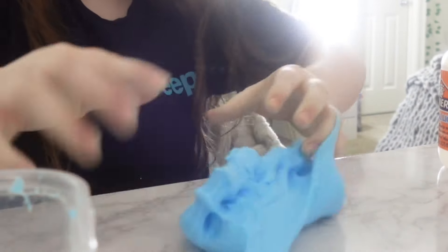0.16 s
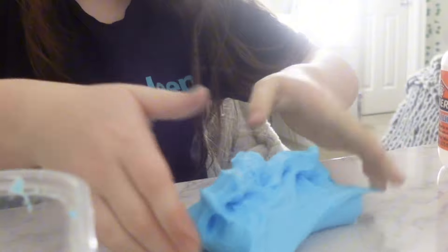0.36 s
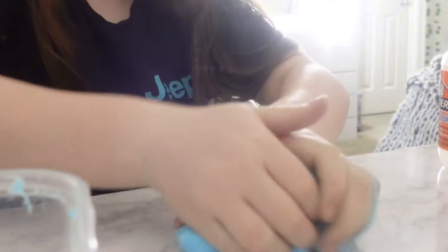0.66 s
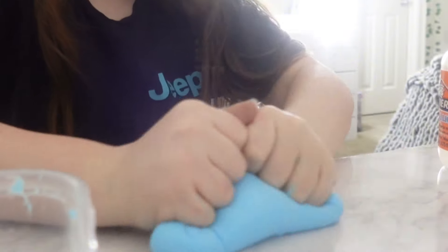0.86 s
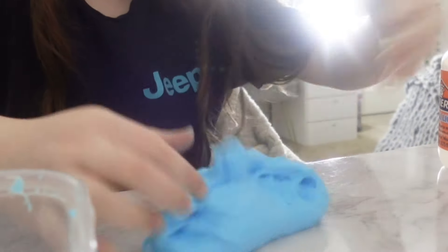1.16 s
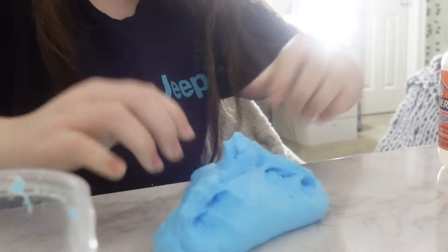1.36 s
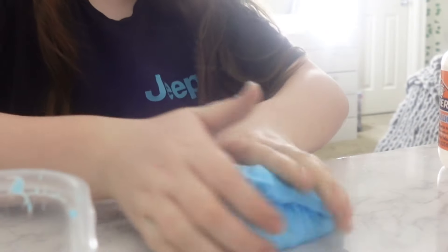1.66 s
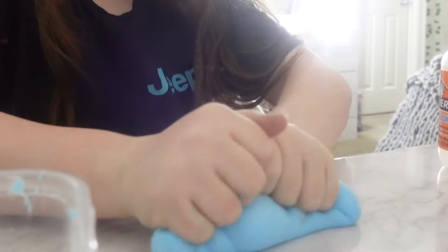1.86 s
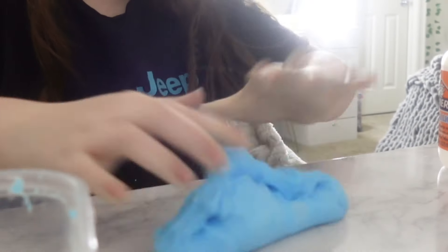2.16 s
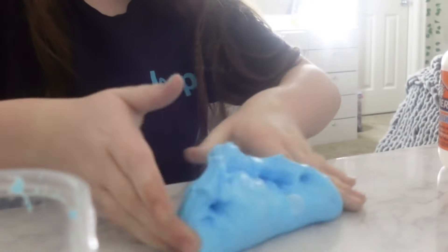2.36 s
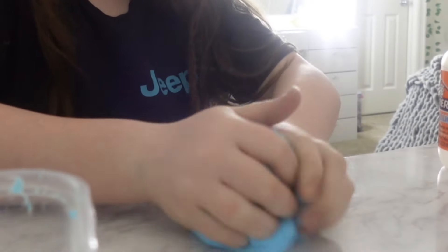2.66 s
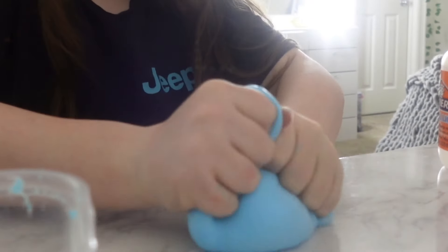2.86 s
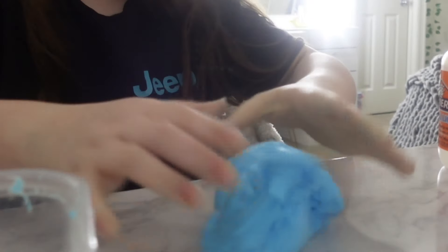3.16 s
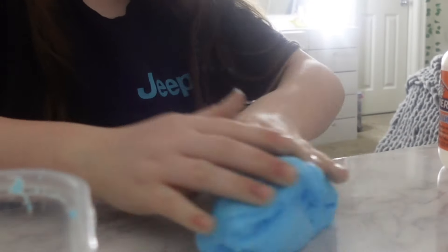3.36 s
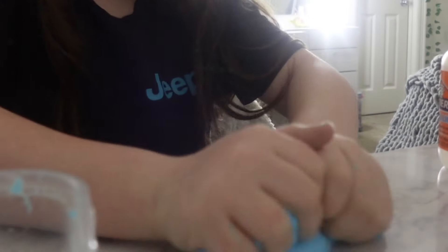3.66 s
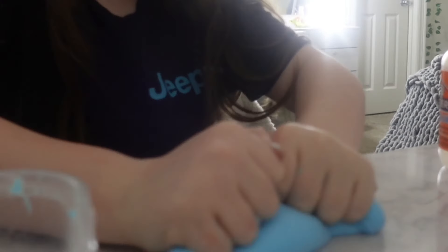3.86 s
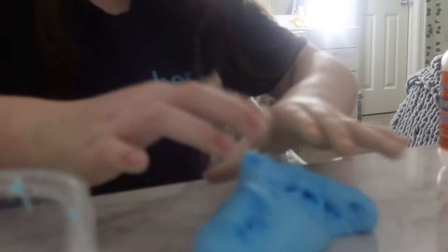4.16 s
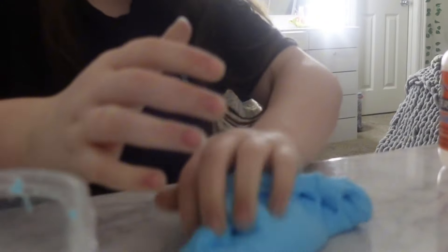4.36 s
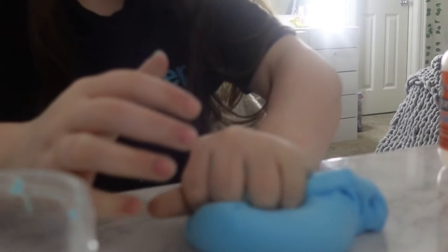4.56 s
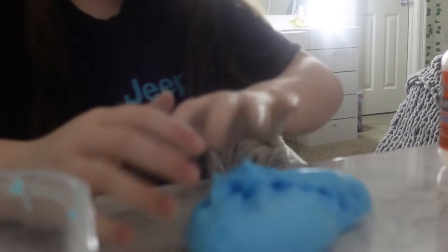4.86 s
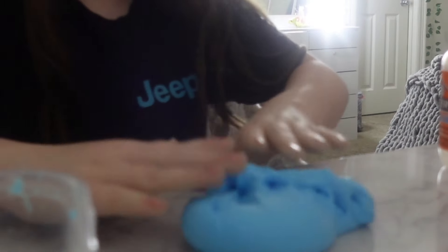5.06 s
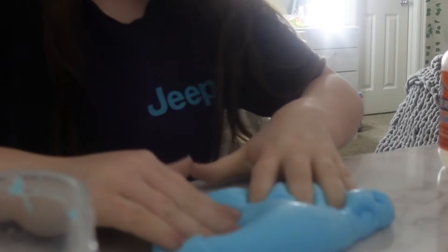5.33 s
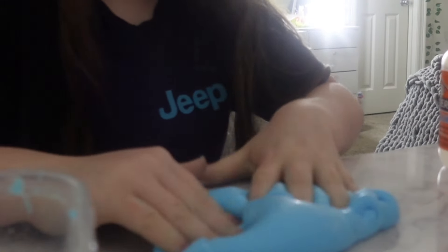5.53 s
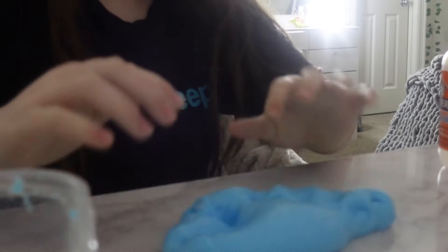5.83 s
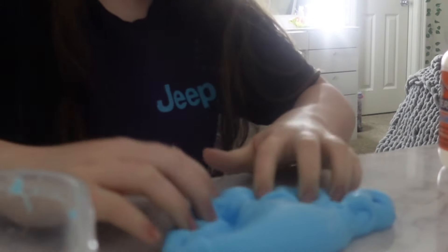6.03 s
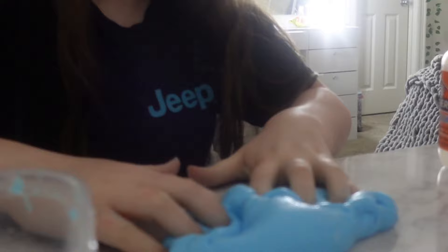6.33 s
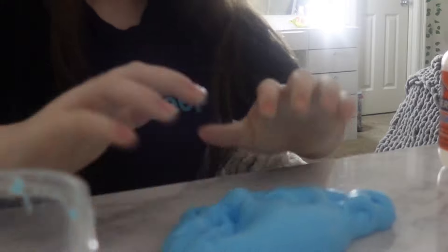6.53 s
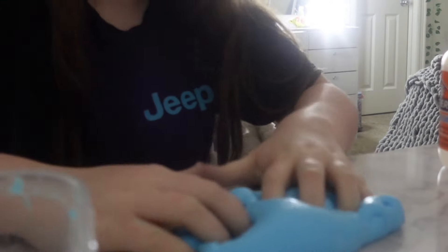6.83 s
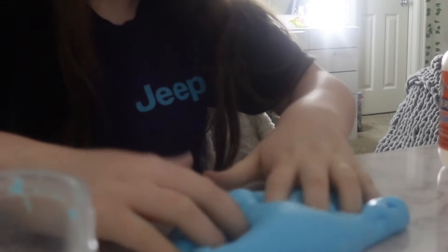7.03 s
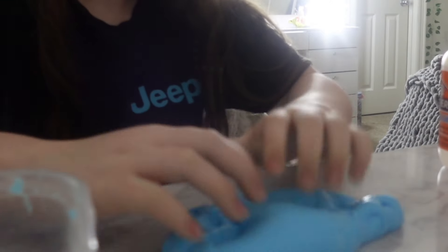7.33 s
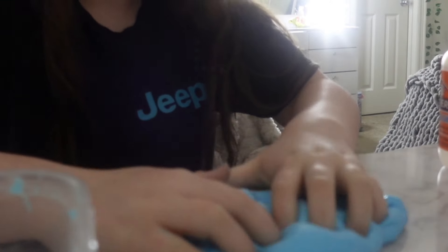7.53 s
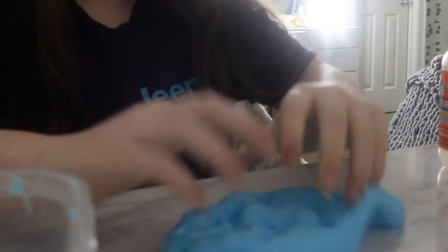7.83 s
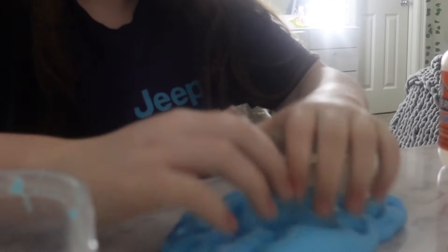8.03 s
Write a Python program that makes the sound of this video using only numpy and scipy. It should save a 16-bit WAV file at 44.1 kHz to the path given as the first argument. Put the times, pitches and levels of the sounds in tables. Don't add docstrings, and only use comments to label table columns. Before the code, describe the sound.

Wet slime kneaded by hand on a hard table, bursting in sharp pops and crackles with squelches, soft thuds and faint fan whirr.

```python
import sys
import numpy as np
from scipy import signal
from scipy.fft import rfft, irfft
from scipy.io import wavfile

SR = 44100
rng = np.random.default_rng(int(sys.argv[2]) if len(sys.argv) > 2 else 0)


def magnitude_from_level(level_db):
    exponent = np.asarray(level_db, float) / 20
    return 10 ** exponent


def store_pcm(level_fs):
    pcm = np.round(np.clip(level_fs, -1, 1) * 32767).astype(np.int16)
    wavfile.write(sys.argv[1], SR, np.atleast_2d(pcm).T)


N = 361179


def rms_one(x):
    return x / np.sqrt(np.mean(x ** 2) + 1e-20)


def at_hz(points, hz):
    known_hz, values = np.array(points)[:, 0], np.array(points)[:, 1]
    return np.interp(np.log(np.maximum(hz, 1)), np.log(known_hz), values)


def highpass(x, order, hz):
    return signal.sosfilt(signal.butter(order, hz, "high", fs=SR, output="sos"), x)


def band(x, low_hz, high_hz):
    edges = [low_hz, min(high_hz, .45 * SR)]
    return signal.sosfilt(signal.butter(2, edges, "band", fs=SR, output="sos"), x)


def ring(x, hz, t60):
    r = magnitude_from_level(-60 / (t60 * SR))
    w = 2 * np.pi * hz / SR
    return signal.lfilter([0, np.sin(w)], [1, -2 * r * np.cos(w), r * r], x + 1e-18)


def drift(rate):
    knots = rng.standard_normal(N // 100)
    return np.interp(np.arange(N) * rate / SR, np.arange(len(knots)), knots)


def grains(pitches_hz, centre_hz, octaves, per_s, spread_db, cycles, wash):
    sizes = magnitude_from_level(spread_db * np.minimum(rng.exponential(1, N), 4)) * rng.choice([-1, 1], N)
    clicks = rms_one(sizes * (rng.random(N) < per_s / SR))
    dealt = rng.integers(0, len(pitches_hz), N)
    white = rng.standard_normal((2, N))
    out, power = 0, 0
    for k, hz in enumerate(pitches_hz):
        nearness = np.exp(-(np.log2(hz / centre_hz) / octaves) ** 2 / 2)
        share = nearness * magnitude_from_level(2.6 * drift(60))
        push = clicks * (dealt == k) + wash * white[k % 2]
        ringing = band(ring(push, hz, cycles / hz), 0.5 * hz, 1.66 * hz)
        out = out + share * rms_one(ringing)
        power = power + share ** 2
    return out / np.sqrt(power)


def effort(s, hold, level_db, rise, fall, build_db):
    settle_db, settle_db_per_s, rest_db = -20.5, 43, -76.5
    t = np.arange(0, N + 44, 44) / SR
    columns = (s, np.maximum(hold, 1e-3), level_db, rise)
    s, hold, level_db, rise = [np.reshape(c, (-1, 1)) for c in columns]
    after = np.maximum(t - s - hold, 0)
    swell_db = build_db * np.clip(1 - (t - s) / hold, 0, 1)
    db = level_db - rise * np.maximum(s - t, 0) - swell_db
    settling = magnitude_from_level(2 * (settle_db - settle_db_per_s * after))
    power = magnitude_from_level(2 * db) * (magnitude_from_level(-2 * fall * after) + settling)
    total_db = 10 * np.log10(power.sum(axis=0) + magnitude_from_level(2 * rest_db))
    return np.interp(np.arange(N) / SR, t, total_db)


def quiet():
    # (pitch [Hz], level [dB per Hz])
    air_colour = [(18, -54), (30, -42), (86, -3.5), (239, -2.5), (280, -5), (364, -5), (702, -9.5),
                  (1350, -10), (2540, -5), (3140, -22.5), (4530, -16.5), (5170, -19), (16000, -31.5)]
    # (pitch [Hz], width [Hz], level [dB])
    fan_tones = [(1640, 29, -9.5), (1970, 76, -12.5), (2240, 74, -13.5), (2641, 43, -6.5),
                 (3500, 140, -6.5), (3940, 88, -4.5), (4460, 81, -4), (4750, 60, -11)]
    # (pitch [Hz], likeness [0 to 1])
    likeness = [(60, 0.87), (400, 0.35), (3100, 0.84), (15000, 0.77)]
    hz = np.arange(N // 2 + 1) * SR / N
    whirr = sum(magnitude_from_level(level_db + 13.5) / (1 + (2 * (hz - f) / width) ** 2) for f, width, level_db in fan_tones)
    alike = np.clip(at_hz(likeness, hz), 0, 1)
    mid, side = rfft(rng.standard_normal((2, N)))
    both = np.sqrt(1 + alike) * mid + np.sqrt(1 - alike) * side * [[1], [-1]]
    air = irfft(both * magnitude_from_level(at_hz(air_colour, hz)) * (1 + whirr), N)
    return magnitude_from_level(-56.5 + 0.8 * drift(2.94) + 0.77 * drift(27.0)) * rms_one(air)


def room(x):
    # (pitch [Hz], time to fall 60 dB [s])
    room_t60 = [(150, 0.45), (600, 0.4), (1500, 0.27), (12000, 0.3)]
    t = np.arange(SR // 2) / SR
    edges = 90 * 2. ** np.arange(8.6)
    white = rng.standard_normal((2, len(t)))
    tail = 0
    for low, high in zip(edges, edges[1:]):
        tail = tail + band(white, low, high) * magnitude_from_level(-60 * t / at_hz(room_t60, 1.96 * low))
    tail = tail * np.clip((t - .003) / 0.0039, 0, 1)
    shared = tail + 1.8 * tail.mean(axis=0)
    shared = shared / np.sqrt(np.sum(shared ** 2) / 2)
    return signal.fftconvolve(x[None], shared, axes=1)[:, :N]


def wall_echo(slime):
    lag = round(.0084 * SR)
    slime[:, lag:] += magnitude_from_level(-21) * band(slime[::-1, :-lag], 490, 16000)
    return slime


def nearby(x):
    t = np.arange(400)
    echoes = band(rng.standard_normal(400), 1500, 15000) * np.exp(-t / 60.0) * (t > 30)
    echoes = [[1], [-1]] * echoes / np.sqrt(np.sum(echoes ** 2))
    return x + magnitude_from_level(-16.5) * signal.fftconvolve(x, echoes, axes=1)[:, :N]


def table(push):
    # (pitch [Hz], level [dB], time to fall 60 dB [s])
    modes = [(528, -54, .16), (590, -53, .1), (470, -55, .1)]
    return sum(magnitude_from_level(level_db) * ring(push, hz, t60) for hz, level_db, t60 in modes)


def knocks():
    # (time [s], level [dB])
    knuckles = [
        (3.858, -35),
        (3.871, -29.5),
        (3.9, -37),
        (4.145, -41),
        (5.828, -32),
        (7.973, -36),
    ]
    clicks = np.zeros(N)
    for s, level_db in knuckles:
        clicks[round(s * SR)] = magnitude_from_level(level_db)
    return ring(clicks, 527., .2)


def thuds():
    # (time [s], hold [s], level [dB])
    landings = [(0.0, 0.086, -49.5), (0.722, .01, -56), (0.878, 0.059, -45.5), (1.052, 0.044, -51),
                (1.913, 0.1, -48), (2.116, 0.025, -50), (2.703, 0.16, -55.5), (3.133, 0.026, -50.5),
                (3.63, 0.14, -62.5), (4.06, 0.13, -61.5), (4.547, 0.015, -66), (4.85, 0.054, -56.5),
                (5.43, 0.032, -57.5), (5.777, 0.072, -49.5), (5.95, .04, -53.5), (6.514, 0.0077, -39.5),
                (6.764, 0.096, -56.5), (7.157, 0.045, -43.5), (7.822, 0.086, -43.5), (7.975, 0.25, -55)]
    thud_db = effort(*np.transpose(landings), rise=459, fall=263.5, build_db=0)
    top = rms_one(band(band(rng.standard_normal(N), 133, 390), 117, 248))
    deep = rms_one(band(rng.standard_normal(N), 23, 140))
    return magnitude_from_level(thud_db - 0.5 + 4.7 * drift(35)) * top, magnitude_from_level(thud_db - 17.5) * deep


def kneading():
    # (time [s], hold [s], film crackle [dB], spray hiss [dB], squelch [dB])
    kneads = [(0.0, 0.089, -36, -38.5, -30), (0.556, 0.12, -54, -63, -51), (0.787, 0.068, -46, -70, -47),
              (0.874, 0.012, -31, -52, -33), (1.038, .13, -41, -46, -39), (1.72, 0.063, -58, -66.5, -60),
              (1.847, 0.01, -43, -43, -56), (1.935, .025, -24, -42, -41), (1.958, 0.021, -20.5, -40, -21),
              (2.118, 0.066, -34.5, -39, -31.5), (2.808, 0.13, -38, -33.5, -37.5),
              (3.719, 0.1, -38, -38, -36.5), (3.807, 0.043, -31, -41, -40),
              (4.514, 0.12, -54.5, -56, -45.5), (4.827, 0.0069, -36, -50, -34.5),
              (4.887, 0.016, -46.5, -45, -41)]
    # (time [s], hold [s], crackle
    # [dB], spray [dB], squelch [dB])
    sudden_strokes = [(0.718, 0.011, -45, -50, -37), (0.874, 0.037, -26.5, -46, -30),
                      (3.074, 0.082, -36, -37.5, -34.5), (3.863, 0.037, -29.5, -40, -24.5),
                      (4.041, 0.11, -40, -41, -33.5), (2.567, 0.0042, -38.5, -44.5, -44),
                      (2.699, 0.042, -36, -65.5, -35.5), (5.751, 0.052, -47, -46, -36),
                      (5.825, 0.0048, -37, -44.5, -25), (6.488, 0.019, -32.5, -44, -24.5),
                      (7.14, 0.025, -31, -41, -33), (7.201, 0.021, -40.5, -46, -32),
                      (7.801, 0.0048, -33.5, -39, -54), (7.873, 0.0057, -34.5, -45, -30),
                      (7.972, 0.0042, -58, -83, -28.5)]
    # (time [s], pitch [Hz], spread [octaves])
    film_pitch = [(0.0, 3320, 0.94), (.9, 3340, 0.74), (.98, 2880, 0.53), (1.06, 3360, 0.9),
                  (1.17, 1940, 1.06), (1.87, 3000, 0.84), (1.92, 4500, 0.79), (1.96, 5270, .4),
                  (2.0, 4700, .45), (2.07, 4270, .5), (2.13, 3080, 1), (3.2, 2620, 1.1),
                  (3.801, 5170, 0.77), (3.85, 4000, .75), (3.89, 1960, 1), (4.85, 2350, 1.34),
                  (6.5, 3220, .7), (7.85, 2650, 0.77)]
    s, hold, film_db, spray_db, squelch_db = np.transpose(kneads + sudden_strokes)
    rise = [414] * len(kneads) + [2500] * len(sudden_strokes)
    film_db = effort(s, hold, film_db, rise, fall=260, build_db=0)
    spray_db = effort(s, hold, spray_db, rise, fall=318, build_db=7)
    squelch_db = effort(s, hold, squelch_db, rise, fall=222.5, build_db=3.5)
    knots, pitch, spread = np.transpose(film_pitch)
    t = np.arange(N) / SR
    film_hz = np.interp(t, knots, pitch)
    film_octaves = np.interp(t, knots, np.clip(spread, .3, 1.5))
    film = grains(np.geomspace(1200, 6700, num=12), film_hz, film_octaves,
                  per_s=3500, spread_db=3.6, cycles=10., wash=.3)
    spray = grains(np.geomspace(8500, 15000, num=5), 10500, .5, per_s=3000, spread_db=4, cycles=2.5, wash=0.4)
    squelch = grains(np.geomspace(480, 1200, num=6), 700, .9, per_s=900, spread_db=2.5, cycles=7.0, wash=.45)
    lump = drift(110)
    film = magnitude_from_level(film_db - 2.5 + 2.2 * lump) * film
    spray = magnitude_from_level(spray_db - 6.0 + 1.8 * lump + 2.5 * drift(30)) * spray
    squelch = magnitude_from_level(squelch_db - 12.5 + 2.4 * drift(76)) * squelch
    return film + spray, squelch


def plops():
    # (time [s], level [dB], hole pitch [Hz])
    hollows = [(0.076, -47, 685), (0.086, -42, 990), (0.353, -52, 596), (1.068, -38.5, 666),
               (1.28, -44, 630), (1.895, -34, 625), (1.927, -27.5, 685), (1.99, -23, 1210),
               (2.124, -30, 680), (2.828, -31.5, 580), (2.9112, -23, 1500), (3.089, -36, 610),
               (3.161, -36, 766), (3.76, -33.5, 825), (3.777, -32, 945), (3.814, -25, 890),
               (3.855, -24, 633), (3.87, -21.5, 720), (4.049, -32, 644), (4.146, -30.5, 666),
               (5.757, -36, 726), (5.823, -22.5, 553), (5.869, -28, 780), (6.514, -21, 790),
               (7.148, -31.5, 635), (7.215, -25, 760), (7.804, -26, 610), (7.859, -23, 607),
               (7.879, -21.5, 616), (7.972, -23.5, 614),
               (.711, -44, 600), (3.876, -31, 580), (3.89, -39, 570), (7.872, -24, 1140), (5.421, -51, 520),
             (8.18, -46, 570), (2.227, -40, 760), (2.9, -49.5, 580), (4.5, -43, 530), (4.541, -41, 560),
             (4.552, -43.5, 760), (7.9, -50, 184), (3.691, -40.5, 560), (4.897, -38, 680),
             (7.203, -32, 870), (7.979, -30, 1040), (5.805, -32, 600), (0.104, -39, 510),
             (2.889, -33, 1170)]
    # (time [s], level [dB], pitch [Hz])
    touches = [
        (0.349, -50, 205),
        (1.611, -50, 205),
        (2.351, -47, 193),
        (5.424, -59, 172),
    ]
    out = np.zeros(N + 2000)
    t = np.arange(2000) / SR
    for s, level_db, hz in hollows + touches:
        swell = (1 - np.exp(-t * hz * 1.39)) * np.exp(-t * hz / 1.35)
        at = round(s * SR)
        out[at:at + len(t)] += magnitude_from_level(level_db + 12) * swell * np.sin(2 * np.pi * hz * t * (0.96 + 12 * t))
    return out[:N]


def chirps():
    # (time [s], peak [dB], pitch [Hz], swell [ms])
    whistles = [(0.0993, -33, 640, 1.3), (0.894, -27, 3970, .9), (.9085, -25, 5200, .9),
                (1.067, -27, 3920, 1.5), (1.154, -38, 1480, 1.5), (1.177, -42, 885, 1.2),
                (1.8949, -18.5, 3700, 0.49), (1.956, -14, 5870, 0.76), (1.982, -19, 1320, 0.89),
                (2.123, -29.5, 1590, 0.87), (2.572, -32, 2500, .8), (2.8742, -24.5, 2860, 0.89),
                (2.8885, -18, 1900, .3), (2.8893, -7, 7550, 0.23), (2.8275, -7, 7400, 0.2),
                (3.7595, -12.5, 3900, .5), (6.4996, -29, 15200, .5), (2.912, -11, 13000, .3),
                (3.0885, -32, 1870, .8), (3.117, -34, 1350, 1.5), (3.1377, -35, 1350, 1.1),
                (3.166, -34, 1440, 1.5), (3.8135, -15.5, 3330, 0.56), (3.857, -14.5, 1530, 0.57),
                (3.870, -11.5, 1250, 0.7), (3.895, -27, 1750, 1.7), (4.0466, -30, 3790, 0.96),
                (4.144, -42, 1090, 0.91), (4.838, -32.5, 1490, 1), (5.8225, -28, 2500, .7),
                (6.482, -25.5, 2150, 0.98), (6.4907, -25, 1900, 0.79), (6.4995, -16, 3170, 0.36),
                (6.4996, -20, 6800, 0.38), (6.5137, -19.5, 2720, 0.86), (7.1362, -19.5, 2630, 0.73),
                (7.136, -17, 5630, 0.45), (7.136, -14, 10050, 0.3), (7.1438, -23, 10600, .4),
                (7.165, -31, 2860, .9), (7.203, -26, 1360, 0.97), (7.802, -22, 1286, 1),
                (7.8596, -12, 2080, 1), (7.860, -17, 2490, 1.1), (7.8665, -23, 1970, .8),
                (7.8763, -18, 2100, .8), (7.972, -23.5, 1200, 1.06), (7.979, -35, 1230, 0.8)]
    out = np.zeros(N + 800)
    t = np.arange(800) / SR
    for s, peak_db, hz, swell_ms in whistles:
        at = round(s * SR)
        age = t * 1000 / max(swell_ms, .15)
        whistle = np.sin(2 * np.pi * hz * t * (1 + 8 * t))
        out[at:at + len(t)] += magnitude_from_level(peak_db) * age * np.exp(1 - age) * whistle
    return out[:N]


def pockets():
    # (time [s], peak [dB], pocket pitch [Hz], spatter [dB])
    deep = [(0.0298, -15, 2500, -29), (0.0826, -16, 4220, -4), (0.0861, -7, 1260, -17),
            (0.712, -8, 3150, -4), (0.7815, -27, 1730, -15), (0.7956, -19.5, 3160, -11),
            (0.8211, -21, 1800, -4), (0.8286, -30, 2380, -9), (0.8385, -8, 3050, -4),
            (0.8589, -13, 2340, -9), (0.876, -1.5, 2850, -2.5), (0.8845, -13, 3000, -4),
            (1.0685, -19, 3940, -2), (1.847, -26, 3120, -21), (1.86, -16, 2140, -36),
            (1.9092, 0.5, 4380, -7.5), (1.9272, 2.5, 4560, -3), (1.9448, -2, 3020, -31),
            (1.9572, -12, 5800, -9), (1.9905, -6, 2400, -33), (2.6958, -4, 3040, -12),
            (3.0901, -22, 3200, 20), (3.5374, -27, 3140, -5), (3.7052, -16.5, 3800, 0),
            (3.76, -9, 4540, -4), (3.7765, -5, 4900, -4), (4.1827, -26, 6300, -4),
            (5.8664, -22.5, 1290, -4), (6.4905, -16.5, 1750, -1), (7.861, -10.5, 3800, -4)]
    # (time [s], peak [dB], pocket pitch [Hz], spatter [dB])
    shallow = [(0.5865, -28.5, 3950, -13), (0.6105, -29.5, 3520, -30), (0.866, -13, 2920, -4),
               (1.801, -27, 4900, -9), (1.8096, -19, 4800, -7), (1.835, -25, 3670, -20),
               (1.9348, -8, 5070, -9), (2.8022, -2, 3950, -11.5), (2.8128, -11.5, 3750, -11),
               (2.8563, -14, 2650, -8), (2.8762, -16, 2800, -10), (2.9746, -22, 3870, -24),
               (3.139, -17.5, 4030, -13), (3.691, -15, 3070, -9), (3.7258, -16, 3790, -15),
               (4.0479, -18, 2780, -30), (4.5433, -29.5, 5600, -4), (4.578, -31, 3300, -20),
               (4.6149, -17.5, 4170, -9), (4.6707, -31, 1710, -2), (4.83, -26, 5800, -6),
               (4.9033, -24.5, 5900, -4), (5.7563, -32, 2720, -9), (6.4839, -14.5, 2740, -10),
               (6.4994, -10, 3440, -4), (7.2023, -27, 1940, -5), (7.8029, -13, 2420, 0.5),
               (7.8362, -15.5, 4040, -3), (7.928, -28.5, 4200, -10), (7.9726, -25.5, 1450, -10)]
    # (time [s], peak [dB], pocket pitch [Hz], spatter [dB])
    blisters = [(1.8957, -19, 1500, -3), (1.9223, 0.5, 4800, -17.5), (2.1056, -21.5, 4460, -8),
                (2.1241, -20.5, 2920, -6), (2.5164, -14.5, 4600, -13), (2.5719, -18, 2730, -9),
                (2.7745, -15, 5310, -11), (2.7958, -17, 6930, -5), (2.8275, -4.5, 7040, -10),
                (2.8427, -16, 3400, 0), (2.8893, -1, 7700, -13.5), (2.912, -6.5, 5500, -7),
                (2.9593, -15.5, 5350, -6.5), (3.7144, -6, 4750, -10.5), (3.752, -4, 6550, -10),
                (3.8143, -8.5, 3940, -3), (3.8567, -2, 3350, -12.5), (3.8703, -4, 2540, -12),
                (3.9408, -22.5, 5920, -3), (4.5295, -27.5, 4500, -9), (5.4619, -27.5, 4220, -6),
                (5.8007, -15.5, 2680, -5), (5.8227, -12.5, 2840, -5), (6.5141, -10.5, 2904, -10.5),
                (7.1361, -12.5, 5600, -4.5), (7.158, -9, 2630, -6), (7.215, -23, 1940, -1),
                (7.799, -8.5, 3430, -18), (7.8575, -4.5, 3160, -10), (7.8779, -18, 2470, -3)]
    # (time [s], peak [dB], pocket pitch [Hz], spatter [dB])
    ticks = [(.275, -38, 7380, -19), (.354, -33, 1530, -13), (.848, -25, 2600, 7), (2.2272, -48, 2360, -20),
             (3.655, -38, 5670, -2), (3.7285, -15, 4240, -11), (3.8381, -13.5, 4220, -16.5),
             (7.149, -20, 2970, -7), (4.5, -36, 2300, -2), (4.489, -40, 1800, -5), (4.632, -26, 5760, -9),
             (4.706, -34.5, 1470, 0), (5.296, -38, 3750, -6.5), (5.574, -40.5, 3580, 5),
             (7.515, -48, 6860, 22), (8.1804, -33, 2600, -18)]
    # (time [s], peak [dB], pocket pitch [Hz])
    cracks = [(0.8735, -16, 2800), (0.8796, -15, 3600), (.8975, -25, 3000), (.921, -17, 2800),
              (0.941, -28, 2800), (.972, -29, 2800), (1.135, -40, 1500), (1.8416, -44, 2760),
              (1.8788, -37, 1720), (1.8832, -30.5, 1800), (1.889, -32, 5000), (1.905, -21, 2500),
              (1.9187, -15, 2700), (1.9286, -8, 6370), (1.994, -14, 4500), (2.1718, -29, 2070),
              (2.7705, -39, 1550), (2.835, -18, 3960), (2.8525, -17, 2500), (2.8672, -36, 4050),
              (2.9087, -21, 3440), (3.0983, -25, 2580), (3.159, -30, 1570), (3.6595, -32.5, 3700),
              (3.7682, -10, 7060), (3.7842, -7.5, 5200), (3.778, -5.5, 4500), (3.762, -20, 4000),
              (1.0408, -38, 2150), (1.135, -33, 3200), (3.0777, -31, 1490), (2.8042, -15, 4500),
              (2.846, -23, 12000), (2.897, -24, 9000), (6.508, -19, 6000), (5.754, -30, 3500),
              (7.9718, -32.5, 4200), (3.7999, -13, 5170), (3.8125, -10, 6000), (3.824, -20, 3620),
              (3.8505, -21, 4650), (3.9485, -25, 9990), (4.0258, -32, 1906), (4.0456, -28, 3620),
              (4.1446, -26.5, 1910), (4.9117, -28, 7490), (4.921, -41, 1500), (5.7958, -32, 3440),
              (5.805, -21.5, 2500), (5.8093, -34, 2670), (6.5223, -22, 3190), (7.1652, -16.5, 2580),
              (7.2144, -23, 9500), (7.8035, -17, 2600)]
    cracks = [(s, peak_db, hz, -5.5) for s, peak_db, hz in cracks]
    kinds = [(deep, -29), (shallow, -16.5), (blisters, -9), (ticks, -13), (cracks, -17.5)]
    bursts = []
    for rows, treble_db in kinds:
        for s, peak_db, hz, spatter_db in rows:
            bursts.append((s, peak_db, hz, treble_db + 2 * np.log2(hz / 3000), spatter_db))
    return bursts


def pops():
    lead = 30
    out = np.zeros((2, N + 600))
    t = np.arange(-lead, 500) / SR
    fade = np.exp(-np.maximum(t, 0) / .0024) * (t > .0002)
    spike = np.diff(np.exp(-(t * 29000.0) ** 2), n=2, prepend=0, append=0)
    for s, peak_db, hz, treble_db, spatter_db in pockets():
        turn = 5.82 * hz * t
        burst = -1.65 * turn * np.exp(-turn ** 2 / 2)
        burst = signal.lfilter(*signal.butter(1, min(0.2 * hz, 4000), "high", fs=SR), burst)
        needle = spike * magnitude_from_level(treble_db - 2.0)
        hiss, aside = rng.standard_normal((2, len(t)))
        hiss = hiss + 0.18 * aside * [[1], [-1]]
        spatter = rms_one(ring(band(hiss, 0.53 * hz, 1.96 * hz), hz, 3.6 / hz))
        spatter = spatter + magnitude_from_level(treble_db + 12.5) * fade ** 0.12 * band(hiss, 5100, 13400)
        spatter = magnitude_from_level(min(spatter_db - 3, -8.5)) * fade * spatter
        one = magnitude_from_level(peak_db - 1.5) * (burst + needle + spatter)
        pan_db = rng.normal(0.028, 0.9)
        one = one + 0.041 * np.roll(one, round(6 + 10 * abs(pan_db)), axis=1)
        at = round(s * SR) - lead
        out[:, at:at + len(t)] += one * magnitude_from_level(np.array([[pan_db], [-pan_db]]))
    return highpass(out[:, :N], 1, 400)


def scene():
    crackle, squelch = kneading()
    thud, deep = thuds()
    holes = plops()
    wet = highpass(holes + squelch + thud, 3, 120)
    slime = pops() + chirps() + knocks() + crackle + deep + wet + table(holes + .4 * squelch)
    slime = wall_echo(slime)
    return nearby(slime) + magnitude_from_level(-11.0) * room(slime.mean(axis=0)) + quiet()


def band_limit(x):
    return signal.sosfilt(signal.butter(12, 16990, fs=SR, output="sos"), x)


def record(dry):
    held = .8 * np.tanh(dry / .8)
    x = signal.sosfilt(signal.cheby2(14, 70, 16750, fs=SR, output="sos"), held)
    mix = highpass(x, 3, 55)
    return band_limit(mix)


dry = scene()
out = record(dry)
store_pcm(out)
```